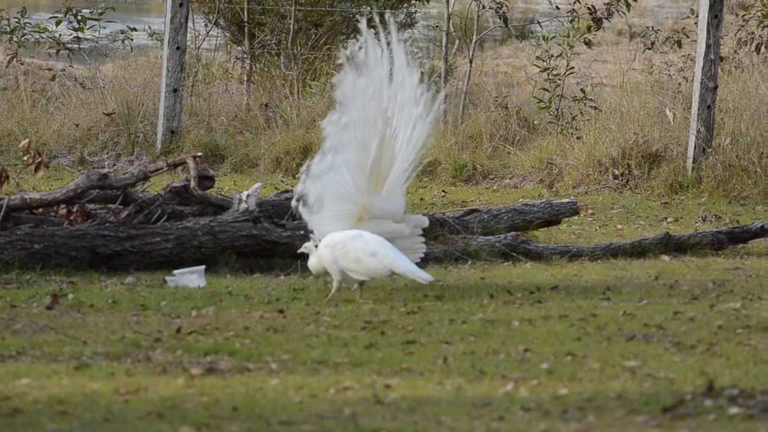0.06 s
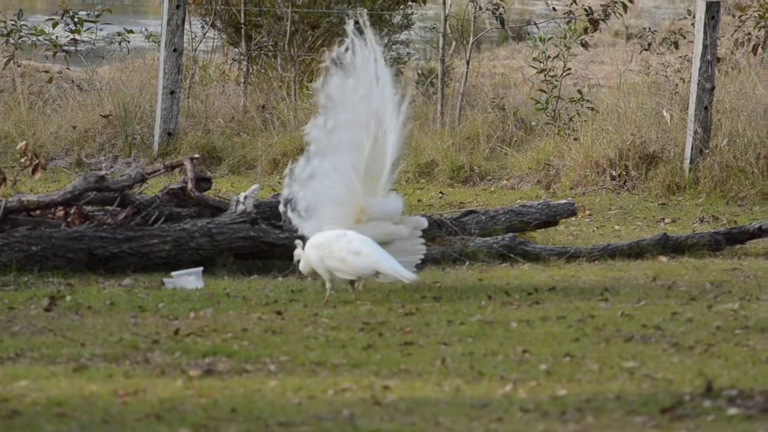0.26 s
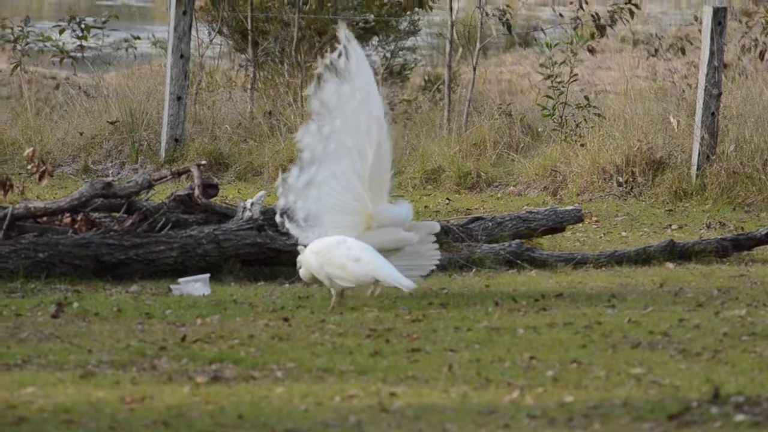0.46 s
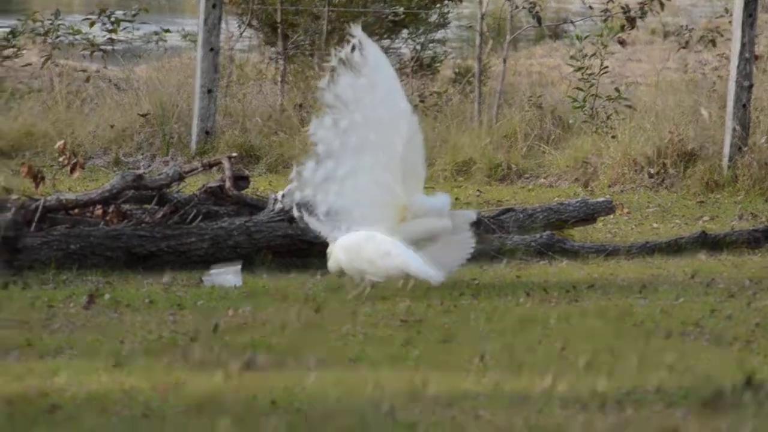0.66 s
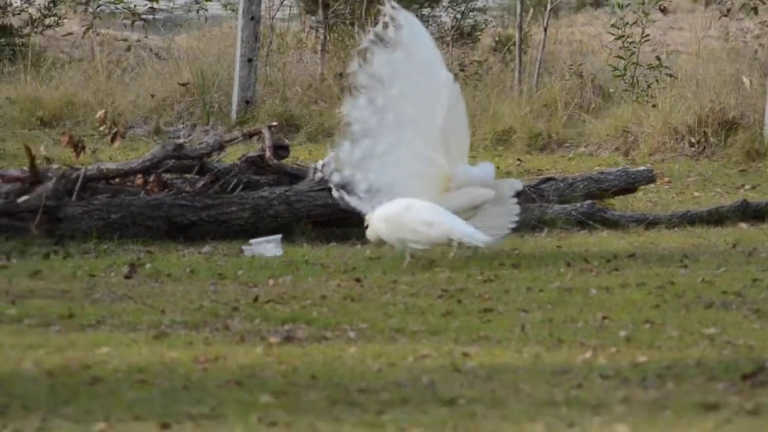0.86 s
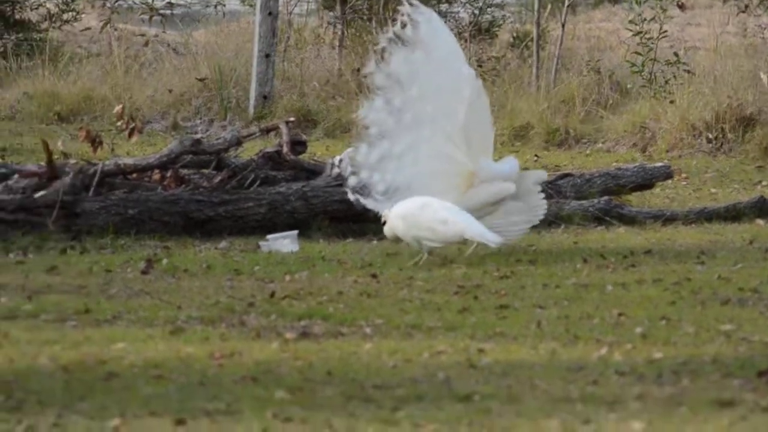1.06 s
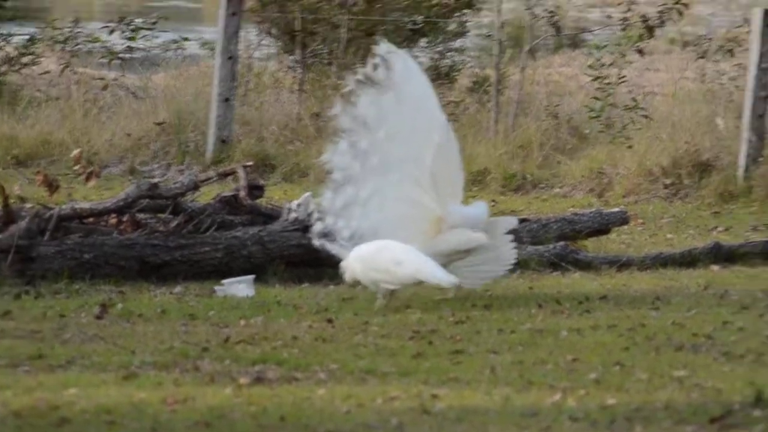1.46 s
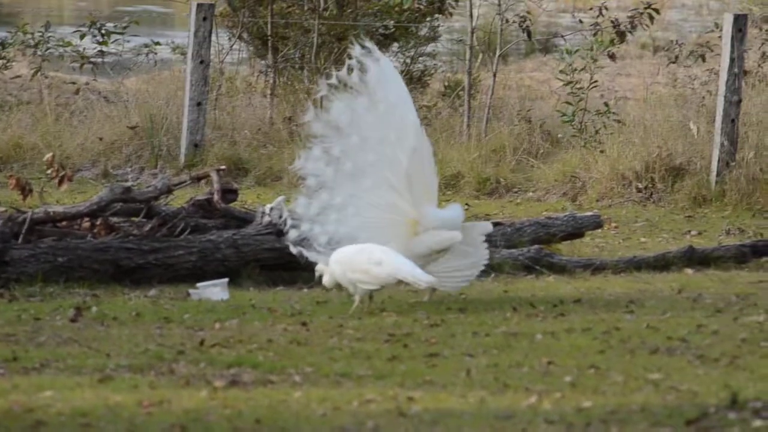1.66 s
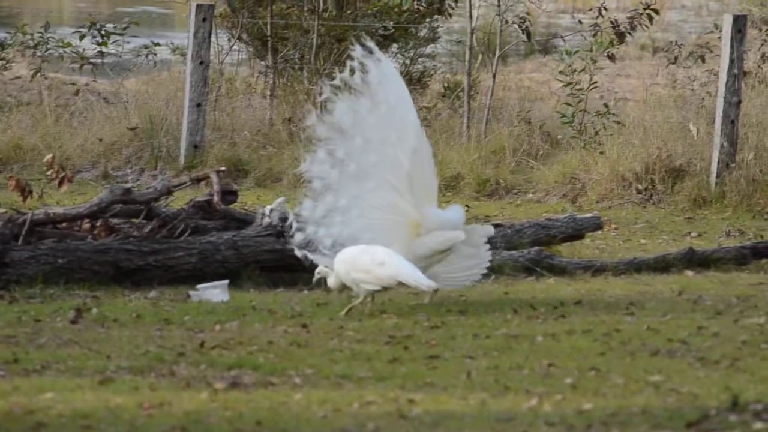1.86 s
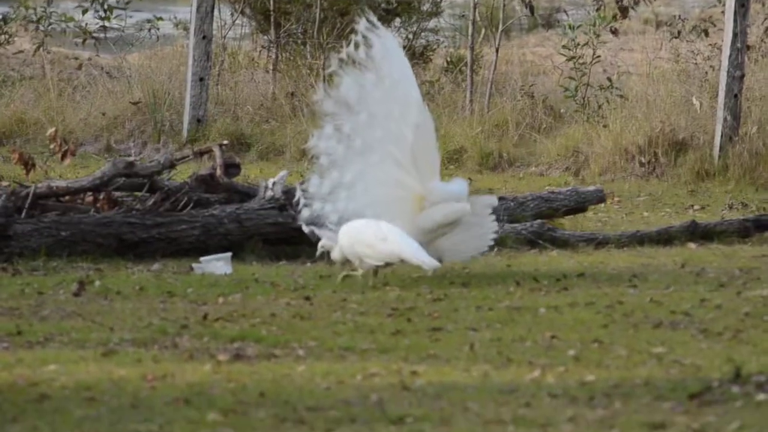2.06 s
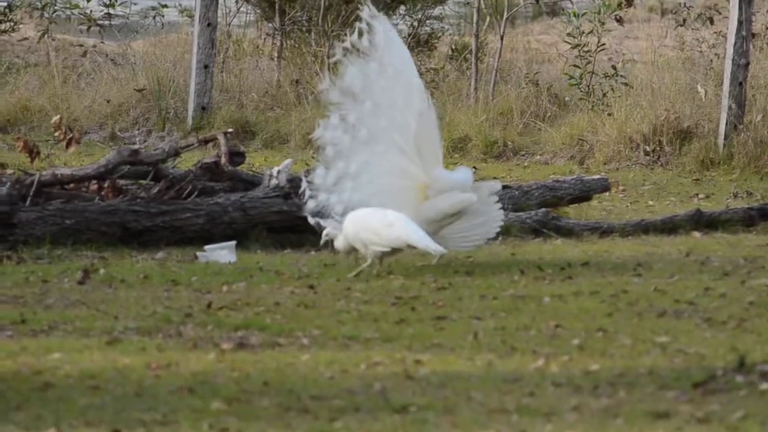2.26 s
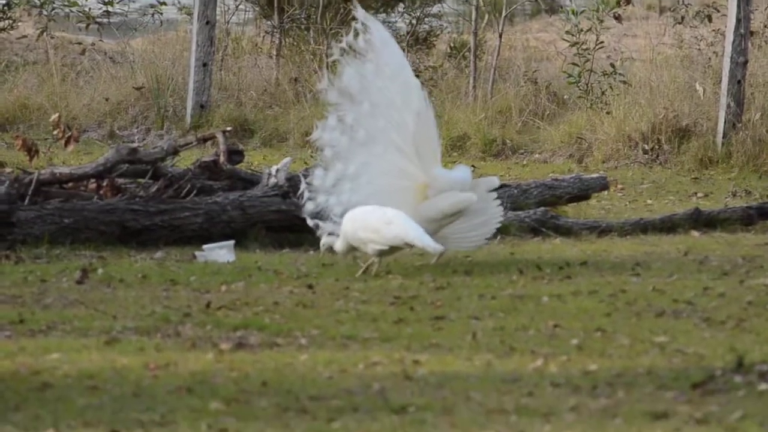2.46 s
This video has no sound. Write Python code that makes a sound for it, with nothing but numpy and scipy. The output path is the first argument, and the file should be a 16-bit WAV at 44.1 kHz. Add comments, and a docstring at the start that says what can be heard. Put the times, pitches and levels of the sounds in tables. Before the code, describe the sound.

Harsh bird calls repeat three times in an open field, each a brief honk and then a rasping screech, fairly near the microphone. Short squeaks and thin, distant falling whistles come before, between and after, over soft background noise.

```python
"""Birds call across a paddock. Over a steady outdoor hush, thin falling whistles and squeaks come first.
Then one bird gives a short nasal honk and a long harsh screech, in which two voices of its syrinx (its
voice box) beat against each other and break into rasp. This pair comes twice more, with squeaks, yelps and
faint blips in between, and the trees return a faint echo. Small birds' whistles are the last calls heard."""
import sys
import numpy as np
from scipy import signal
from scipy.fft import rfft, irfft
from scipy.io import wavfile

SR = 44100
rng = np.random.default_rng(int(sys.argv[2]) if len(sys.argv) > 2 else 0)


def waveform_to_disk(signal):
    """Save audio, clipped to [-1, 1], as 16-bit WAV at the path in sys.argv[1]."""
    frames = np.transpose(np.atleast_2d(signal))
    scaled = np.clip(frames, -1, 1) * 32767
    samples = np.round(scaled).astype(np.int16)
    wavfile.write(sys.argv[1], SR, samples)


N = 110250
T = np.arange(N) / SR

# A colour says how strong the low and high parts of a sound are. Levels are relative; 0 dB is no change.
# colours of the outdoor hush and of the echo (frequency [Hz], level [dB])
HUSH_COLOUR = [(15, -56), (25, -28), (101, -13), (215, -18), (457, -8.5), (582, -10.5), (702, -1),
               (825, -11.5), (996, -8.5), (1380, -10.5), (1660, -3.5), (2120, -16), (2550, -12.5),
               (3530, -21.5), (3930, -20.5), (4490, -20), (5720, -20.5), (7490, -26), (10100, -36.5),
               (11200, -44), (15500, -51.5)]
TREE_COLOUR = [(200, 16.5), (1000, -6), (1750, -4), (3000, -10.5), (6000, -3.5), (12000, -31)]
# soft bumps of air on the microphone (start [s], length [s], level [dB])
AIR_BUMPS = [(.32, .09, -48.5), (2.33, .05, -47), (2.465, .06, -40)]
# narrow dips of the microphone (frequency [Hz], narrowness [Q])
MIC_DIPS = [(5720, 10), (6900, 83)]

# short sounds (start [s], length [s], first pitch [Hz], last pitch [Hz], level [dB], roughness [0-1])
FAINT_BLIPS = [(2.1, 0.023, 720, 710, -41, 0.7), (0.87, 0.039, 2100, 657, -41, 0.46),
               (1.5, 0.02, 560, 520, -36, 0.57), (1.65, 0.026, 2300, 1400, -39, .6)]  # two stay low, near 550 and 700 Hz; two slide down from higher up
WHISTLE_NOTES = [(.028, 0.11, 7100, 5510, -43.5, .03), (.115, 0.078, 5400, 5140, -39.5, .02),
                 (.268, 0.059, 7600, 6600, -45, .05), (.972, 0.14, 5780, 4660, -40.5, 0.017),
                 (1.07, 0.098, 4730, 4400, -48, 0.037), (1.178, 0.053, 10200, 10000, -54.5, .03),
                 (1.565, 0.066, 9800, 9730, -56, .01), (1.43, .14, 4750, 4160, -44, 0.31),
                 (1.615, 0.044, 8000, 6900, -48.5, 0.46), (1.61, 0.1, 4850, 4540, -48.5, 0.28),
                 (1.695, 0.13, 5230, 4280, -48.5, .12), (1.78, 0.08, 6300, 5850, -51.5, 0.056),
                 (1.85, 0.1386, 5100, 4850, -41.5, 0.1), (2.13, .135, 4810, 4460, -35, 0.121),
                 (2.24, .12, 4060, 3820, -47, 0.11), (2.36, 0.13, 4250, 3950, -44.5, 0.084),
                 (2.44, 0.063, 3990, 4140, -40.5, 0.17)]
YELP_NOTES = [(.055, 0.04, 1257, 1473, -33, 0.74), (.305, 0.051, 1293, 1160, -30, 0.24),
              (.305, 0.043, 1900, 1740, -26, 0.59), (.38, 0.022, 1396, 1285, -34, 0.67),
              (.654, 0.017, 1557, 1454, -26, 0.5), (.845, 0.049, 1800, 1792, -25, 0.28),
              (.894, 0.043, 1442, 1133, -29.5, .3), (.9, 0.039, 1910, 1800, -33, 0.97),
              (1.42, 0.063, 1780, 1724, -25.5, 0.32), (1.478, 0.06, 1300, 1119, -26, .45),
              (1.533, 0.045, 1106, 1275, -28.5, 0.22), (1.592, 0.03, 2350, 2350, -37.5, .3),
              (1.99, 0.042, 1474, 1636, -34, .25), (2.017, 0.038, 1850, 2020, -31.5, .5),
              (2.025, 0.026, 1410, 1230, -33, 0.59)]
SQUEAK_NOTES = [(.044, 0.051, 2400, 2600, -35, 0.14), (.09, 0.018, 3150, 3060, -42, 0.1),
                (.21, 0.091, 2950, 3330, -32.5, 0.15), (.245, 0.059, 2600, 2890, -28, .15),
                (.283, 0.043, 3000, 2660, -24, 0.2), (.375, 0.037, 2700, 2710, -34.5, .3),
                (.436, 0.014, 2750, 2900, -39, 0.2), (.635, 0.053, 2480, 2700, -40, 0),
                (.8, 0.09, 2930, 3395, -28.5, 0), (.855, 0.063, 2700, 2920, -28.5, .15),
                (.884, 0.033, 2950, 2684, -24, 0.02), (1.2, 0.086, 2550, 2710, -41, 0.3),
                (1.223, .016, 2800, 2840, -32, .2), (1.4, 0.083, 3170, 3315, -31.5, 0.02),
                (1.463, 0.04, 2800, 2640, -27, .2), (1.498, 0.019, 2350, 2190, -28.5, .3),
                (1.82, 0.054, 2350, 2628, -34, 0.24), (2.003, 0.086, 3050, 3325, -32.5, 0),
                (2.022, 0.068, 2580, 2730, -27.5, .15), (2.025, .045, 3800, 3900, -37.5, .12)]
# harmonics of each sound: its tones at 1, 2, 3... times the pitch (level [dB])
BLIP_TONES = [0, -17]
WHISTLE_TONES = [0, -42]
YELP_TONES = [-0.5, -24, -26.5, -27]
SQUEAK_TONES = [-0.5, -17, -34, -34]
HONK_TONES = [1, -6, -15, -29, -25, -30, -35.5, -40]
UPPER_VOICE_TONES = [0, -46, -36]
# colours of the hiss in rough sounds and of the beak that shapes near voices (frequency [Hz], level [dB])
HISS_COLOUR = [(500, -35), (1100, 7.5), (2400, 5.5), (4200, -3), (6000, -11), (11000, -23), (14000, -44)]
BEAK_COLOUR = [(300, -7), (780, -16), (960, 0.5), (4400, -0.5), (5200, -0.5), (6000, 3.5), (8000, -2),
               (10500, 2.5), (12000, 0), (13500, -19), (16000, -40)]

# honks (start [s], turns clear [s], end [s], pitch [Hz], level [dB], wave repeats after [cycles])
HONK_CALLS = [(0.185, 0.23, 0.28, 977.6, -21.5, 2), (1.01, 1.052, 1.107, 993, -23, 2),
              (1.829, 1.878, 1.924, 986, -22, 3)]
# colours of the rasp in a honk, and early and late in a screech (frequency [Hz], level [dB])
HONK_RASP_COLOUR = [(200, -29), (350, -13), (820, -28), (1030, 6), (1300, -0.5), (1600, 4), (2000, -19),
                    (2600, -9.5), (4200, -30.5), (5050, -8), (5700, -26.5), (7000, -26), (11000, -30.5),
                    (12300, -40), (14000, -60)]
EARLY_RASP_COLOUR = [(200, -31), (370, -13.5), (820, -15), (1000, 12), (1300, 2.5), (1700, 12), (2300, 0.5),
                     (3100, 0), (4300, -11), (5050, 1.5), (5800, -13.5), (11500, -23.5), (13200, -40),
                     (16000, -56)]
LATE_RASP_COLOUR = [(200, -41), (370, -6.5), (520, -29), (850, -10), (1100, -15), (1400, -1.5),
                    (1850, 10.5), (2300, -2), (3200, -1), (4300, -11.5), (5200, -11.5), (5800, -19),
                    (7800, -16.5), (9800, -44), (14500, -38), (15300, -65)]
# one curve a screech (time [s], upper voice [dB], upper pitch [Hz], lower voice [dB], rasp [dB])
SCREECH_CURVES = [
    [(0.415, -33, 1640, -53, -43), (0.419, -44, 1650, -50, -35), (0.429, -22, 1649, -43, -39),
     (0.441, -29, 1670, -18, -30), (0.459, -7.5, 1670, -21.5, -30), (0.501, -8, 1710, -19.5, -27),
     (0.519, -12, 1730, -17, -25.5), (0.545, -13, 1760, -13, -29.5), (0.569, -20, 1780, -42, -28),
     (0.593, -20, 1770, -22.5, -37), (0.62, -52, 1740, -40, -46)],
    [(1.205, -39, 1472, -45, -33), (1.221, -45, 1455, -31, -51), (1.233, -17.5, 1470, -49, -40),
     (1.257, -27, 1629, -31, -30), (1.267, -33, 1650, -21.5, -32.5), (1.285, -6, 1640, -20.5, -27.5),
     (1.325, -23.5, 1710, -15.5, -24), (1.345, -11, 1770, -17, -25), (1.403, -27, 1770, -30, -28),
     (1.43, -19, 1740, -23, -43)],
    [(2.05, -49, 1597, -44, -41), (2.082, -15, 1654, -49, -29.5), (2.096, -14, 1670, -27, -27),
     (2.132, -9, 1716, -14, -27.5), (2.142, -20.5, 1720, -18, -25.5), (2.158, -11, 1760, -28, -24.5),
     (2.19, -16.5, 1804, -22.5, -25), (2.206, -36, 1827, -41, -25.5), (2.228, -20.5, 1850, -21, -32),
     (2.248, -34.5, 1820, -37, -45), (2.26, -34, 1810, -48, -43)],
]
# how rough each screech starts (roughness [0-1])
START_ROUGHNESS = [0.26, 0.39, 0.368]
# tones the two voices make together (upper pitch [times], lower pitch [times], level vs lower voice [dB])
BEAT_TONES = [(1, -1, -13), (1, 1, -17.5)]


def gain(db):
    """Turn decibels into a number to multiply by."""
    return 10 ** (np.asarray(db) / 20)


def colour(sound, points):
    """Turn the low and high parts of a sound up or down along (frequency [Hz], level [dB]) points."""
    hz, db = np.array(points, float).T
    frequencies = np.arange(N + 1) * SR / (2 * N) + 1
    curve_db = np.interp(np.log(frequencies), np.log(hz), db)
    return irfft(rfft(sound, 2 * N) * gain(curve_db))[:N]


def noise(points):
    """Noise of a given colour, with a typical size of 1."""
    hiss = colour(rng.standard_normal(N), points)
    return hiss / hiss.std()


def flutter(hz):
    """A random wiggle up to about the given rate, with a typical size of 1."""
    wiggle = signal.sosfilt(signal.butter(2, hz, fs=SR, output="sos"), rng.standard_normal(N))
    return wiggle / wiggle.std()


def fade(start, end, rise_s, fall_s):
    """Fade in smoothly, hold, then fade out."""
    ramp = np.minimum((T - start) / rise_s, (end - T) / fall_s)
    return np.sin(np.pi / 2 * np.clip(ramp, 0, 1)) ** 2


def vibration(hz, rough):
    """Phase (place in the cycle) and strength of a vibration; roughness shakes both."""
    shaky_hz = hz * (1 + rough * 0.05906 * flutter(hz=221.6))
    phase = 2 * np.pi * np.cumsum(shaky_hz) / SR
    strength = np.tanh(1 + rough * 1.06 * flutter(hz=154)) / np.tanh(1)
    return phase, strength


def tone(phase, harmonics_db):
    """Add up sine waves at 1, 2, 3... times the pitch."""
    return np.sqrt(2) * sum(gain(db) * np.sin((k + 1) * phase) for k, db in enumerate(harmonics_db))


def hush(level_db=-40, bump_hz=71):
    """Distant outdoor noise wavers a little, and air bumps softly on the microphone."""
    air = noise(HUSH_COLOUR) * gain(level_db + 0.58 * flutter(hz=2.3))
    bumps = sum(gain(db) * fade(start, start + length, length / 2, length / 2)
                for start, length, db in AIR_BUMPS)
    rumble = noise([(bump_hz / 2, -30), (bump_hz, 0), (bump_hz * 2, -25), (600, -75)])
    return air + bumps * rumble


def echo(sound, level_db=-21, die_away_s=1.07, delay_s=0.03):
    """Trees and a bank scatter the sound back as many faint reflections."""
    tail = noise(TREE_COLOUR) * gain(-60 * T / die_away_s) * np.clip(T / delay_s - 1, 0, 1)
    return gain(level_db) * signal.fftconvolve(sound, tail / np.linalg.norm(tail))[:N]


def short_sounds(table, harmonics_db, swell, hiss_db, wobble, bend):
    """Each sound swells over a share of its length, wavers and glides in pitch; rough ones carry hiss."""
    total = np.zeros(N)
    hiss = noise(HISS_COLOUR) * gain(hiss_db)
    pitch_waver = 1 + wobble * .007 * flutter(hz=46.5)
    level_waver = gain(wobble * 1.04 * flutter(hz=46.5))
    for start, length, first_hz, last_hz, db, rough in table:
        progress = np.clip((T - start) / length, 0, 1)
        glide = np.expm1(-bend * progress) / np.expm1(-bend)  # quick at first, then slower
        phase, strength = vibration((first_hz + (last_hz - first_hz) * glide) * pitch_waver, rough)
        shape = fade(start, start + length, rise_s=swell * length, fall_s=min(.011, length / 2))
        total += gain(db) * shape * (strength * tone(phase, harmonics_db) + rough * hiss)
    return total * level_waver


def honk(start, clears, end, hz, db, cycles):
    """A rasp locks into a clear nasal tone, with faint extra tones between its first two harmonics."""
    clear = .5 + .5 * np.tanh((T - clears) / 0.0065)  # rises from 0 to 1
    harsh = 1 - clear
    pitch = hz * (1 + .04 * harsh + .007 * flutter(hz=46.5))
    phase, strength = vibration(pitch, rough=0.093 + 0.697 * harsh)
    extra = sum(np.sin((1 + k / cycles) * phase) for k in range(1, cycles))
    extra *= np.sqrt(2) * gain(-12.5) * (1 + 0.13 * flutter(hz=100))
    voice = strength * (tone(phase, HONK_TONES) * (clear + .3 * harsh) + extra)
    rasp = noise(HONK_RASP_COLOUR) * gain(-2.5) * (harsh + 0.59 * clear)
    return gain(db) * (colour(voice, BEAK_COLOUR) + rasp) * fade(start, end, rise_s=0.019, fall_s=0.012)


def screech(curve, start_rough, end_rough=0.74, rise_hz=43.7, lower_hz=1024):
    """Two thin skins in the voice box vibrate, strain upward and grow rougher; the rasp darkens late."""
    times, *columns = np.array(curve).T
    upper_db, upper_hz, lower_db, rasp_db = (np.interp(T, times, column) for column in columns)
    progress = np.clip((T - times[0]) / (times[-1] - times[0]), 0, 1)
    late = .5 + .5 * np.tanh((progress - 0.582) / 0.18)  # turns from 0 to 1 just past the middle
    early = 1 - late
    rough = start_rough * early + end_rough * late
    upper_phase, upper_strength = vibration(upper_hz + rise_hz * late, rough)
    lower_phase, lower_strength = vibration(lower_hz * (1 + 0.044 * late), 0.28 * (1 + 1.64 * late))
    # a fast throb splits the upper voice into side tones and hums at twice its own rate
    throb_phase, _ = vibration(hz=188.2, rough=1.45)
    throb = (start_rough * early + 0.82 * late) * np.sin(throb_phase)
    hum = gain(rasp_db - 19) * np.sqrt(2 * progress) * np.sin(2 * throb_phase)
    upper = tone(upper_phase + throb, UPPER_VOICE_TONES)
    upper *= gain(upper_db + 2.5) * upper_strength * (1 + 0.37 * throb)
    beats = sum(gain(db) * np.sin(up * upper_phase + low * lower_phase) for up, low, db in BEAT_TONES)
    lower = gain(lower_db - 2.5) * lower_strength * np.sqrt(2) * (np.sin(lower_phase) + beats)
    # a shrill tone joins late in the call
    shrill_phase, shrill_strength = vibration(hz=3146, rough=0.2475)
    shrill = gain(rasp_db + 1.5) * late * shrill_strength * np.sin(shrill_phase)
    rasp = gain(rasp_db + 9) * (early * noise(EARLY_RASP_COLOUR) + late * noise(LATE_RASP_COLOUR))
    shape = fade(times[0], times[-1], rise_s=0.0056, fall_s=0.017)
    return colour((upper + lower + shrill) * shape, BEAK_COLOUR) + (rasp + hum) * shape


def scene():
    """Mix the birds, the faint blips, their echo and the hush into one channel."""
    screeches = sum(screech(curve, rough) for curve, rough in zip(SCREECH_CURVES, START_ROUGHNESS))
    honks = sum(honk(*call) for call in HONK_CALLS)
    squeaks = short_sounds(SQUEAK_NOTES, SQUEAK_TONES, swell=0.27, hiss_db=5.5, wobble=0.37, bend=3.41)
    yelps = short_sounds(YELP_NOTES, YELP_TONES, swell=0.19, hiss_db=-4, wobble=1.12, bend=2.3)
    near = screeches + honks + colour(squeaks + yelps, BEAK_COLOUR)
    whistles = short_sounds(WHISTLE_NOTES, WHISTLE_TONES, swell=0.28, hiss_db=-9, wobble=0.79, bend=2.1)
    blips = short_sounds(FAINT_BLIPS, BLIP_TONES, swell=0.31, hiss_db=-15, wobble=1.73, bend=1.77)
    faint = whistles + blips
    reflections = echo(near + gain(11.5) * faint)  # extra echo makes these sound farther off
    return (near + faint + reflections + hush())[None]


def record(dry, ceiling=1.02, top_hz=15640):
    """The microphone has two narrow dips, softly flattens the loudest peaks and cuts the highest treble."""
    for hz, narrowness in MIC_DIPS:
        dry = signal.lfilter(*signal.iirnotch(hz, narrowness, fs=SR), dry)
    flattened = dry / (1 + (dry / ceiling) ** 8) ** (1 / 8)
    return signal.sosfilt(signal.ellip(8, .2, 70, top_hz, fs=SR, output="sos"), flattened)


dry = scene()
out = record(dry)
waveform_to_disk(out)
```